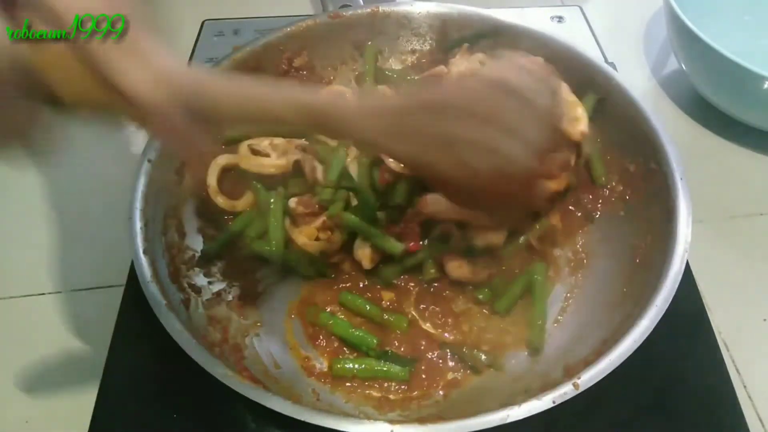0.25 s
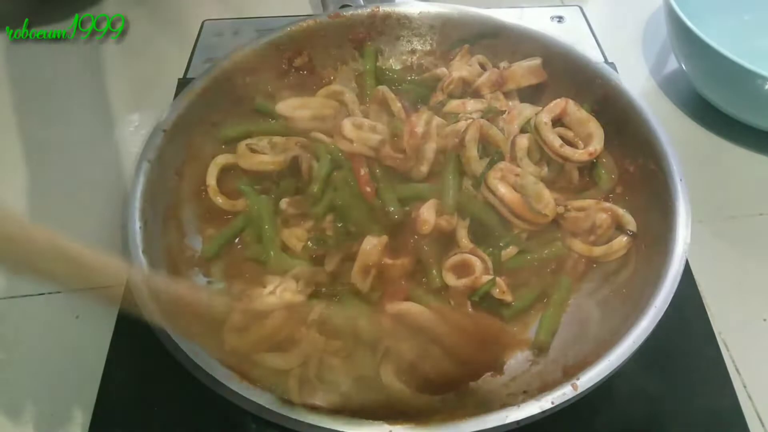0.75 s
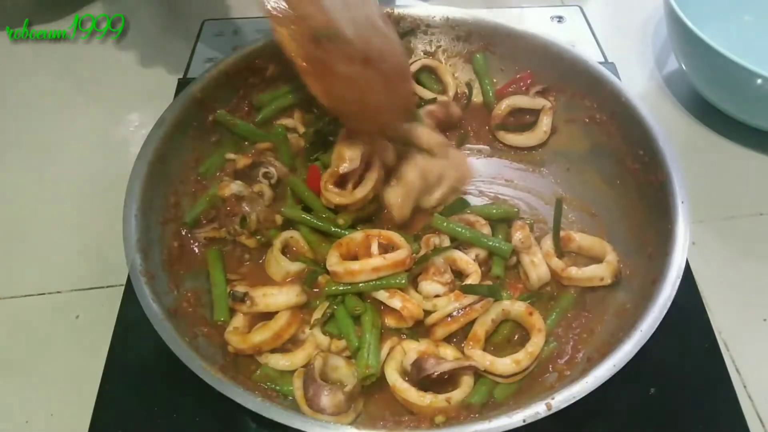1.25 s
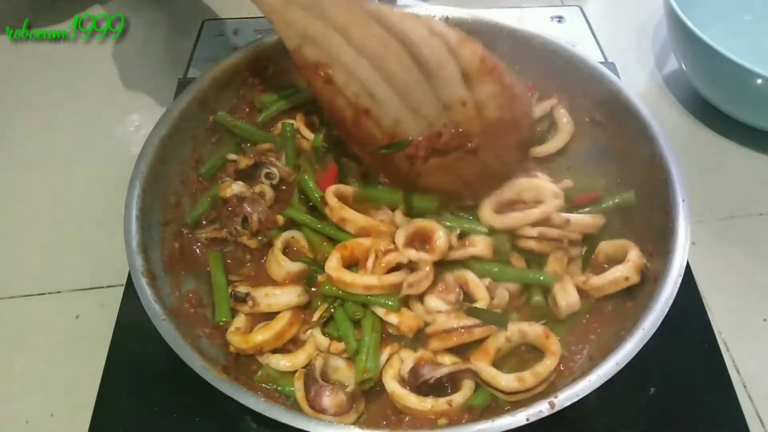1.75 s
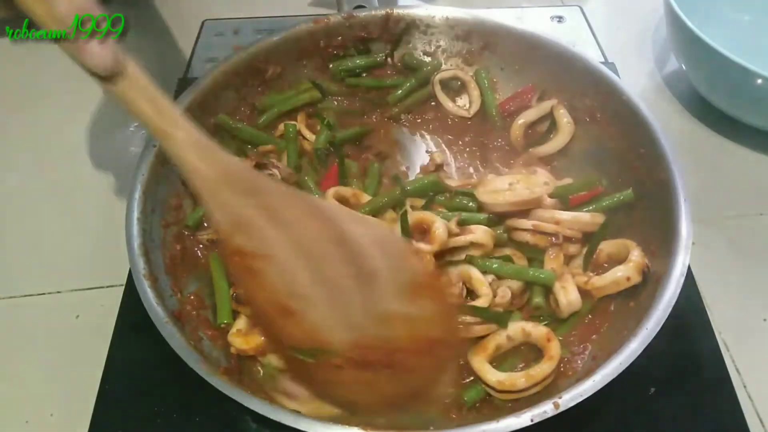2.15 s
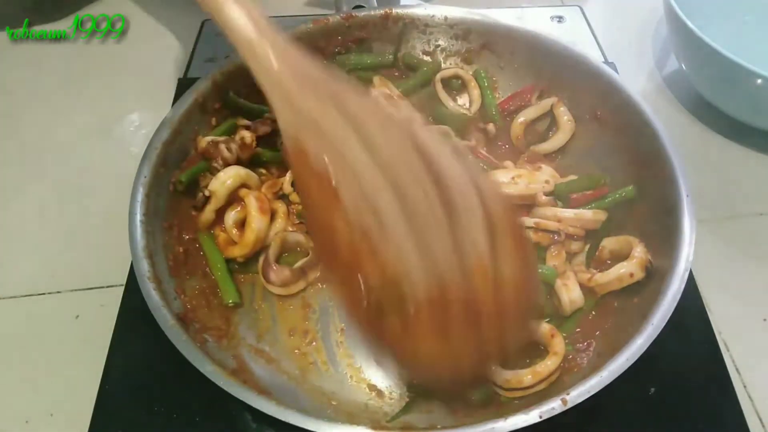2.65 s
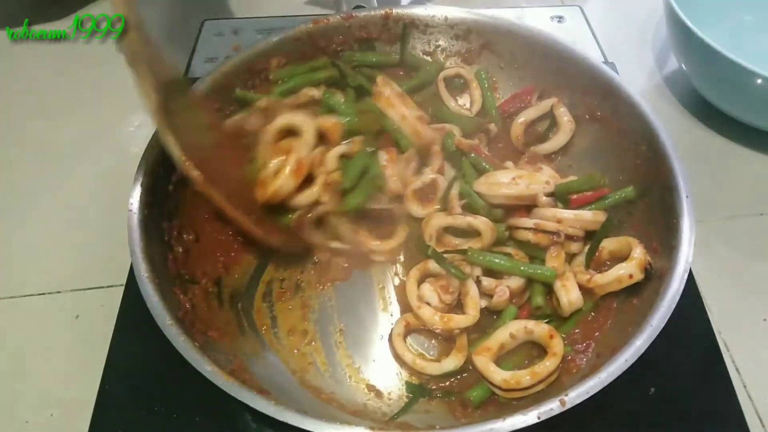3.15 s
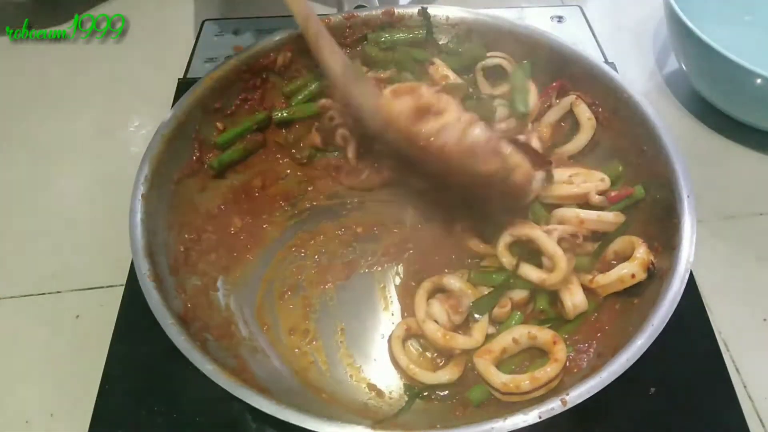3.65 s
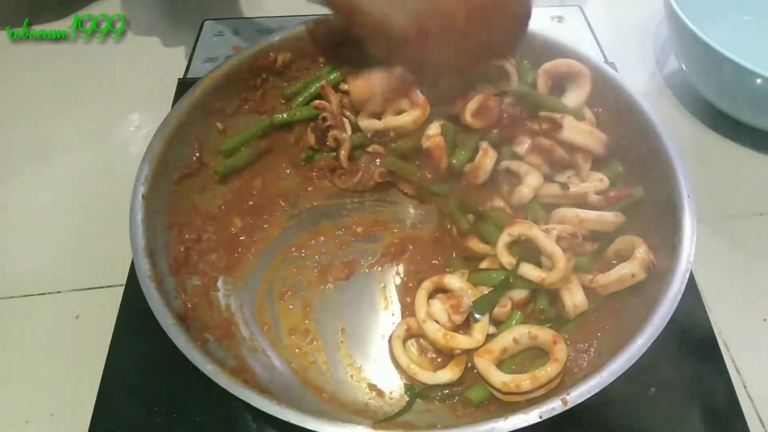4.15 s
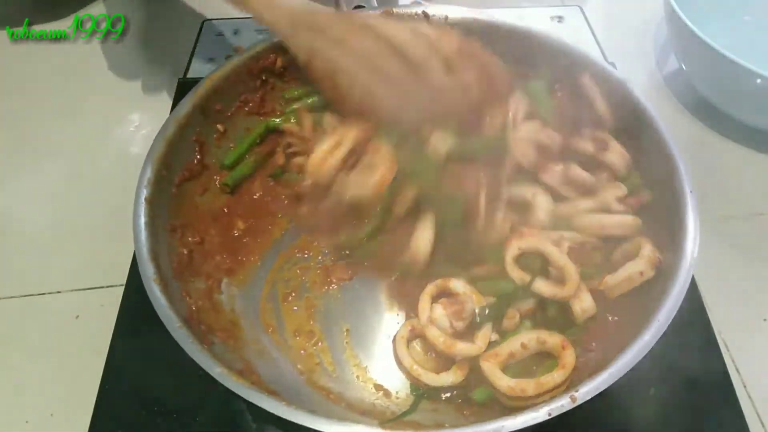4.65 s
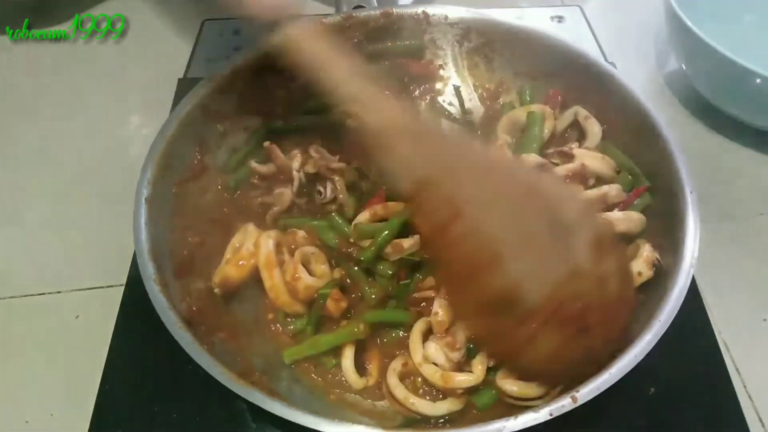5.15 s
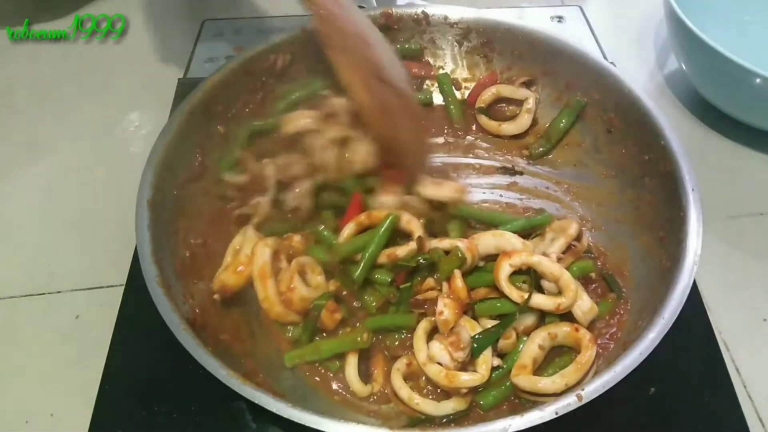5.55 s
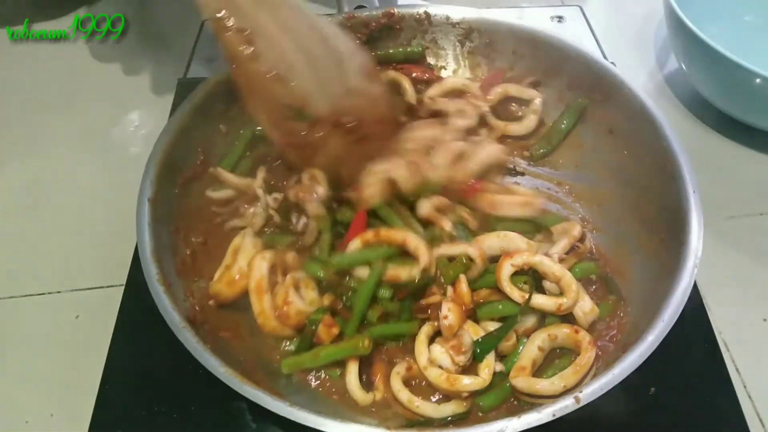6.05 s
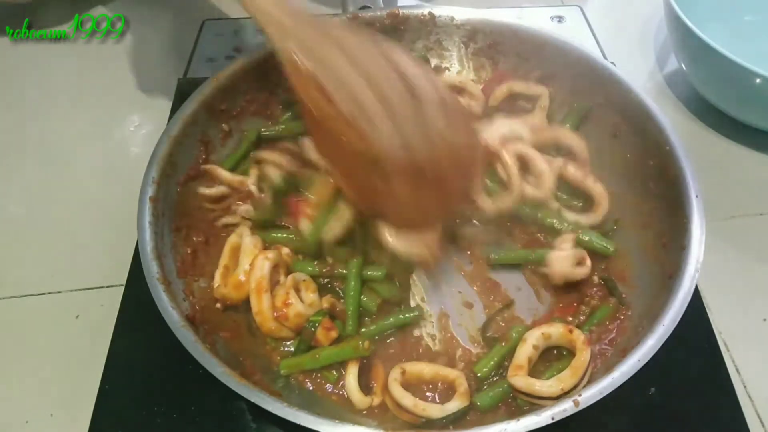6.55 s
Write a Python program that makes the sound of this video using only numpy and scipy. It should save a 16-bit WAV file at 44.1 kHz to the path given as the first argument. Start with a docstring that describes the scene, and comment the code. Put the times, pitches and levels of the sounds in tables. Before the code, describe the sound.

Close to a steel pan in a small tiled kitchen, a wooden spatula pushes squid and beans through thick sauce. Each stroke makes a bright fizz with wet smacks, sharp spits and a soft scrape, then quickly fades. Light knocks come in the first three seconds while a low engine outside pulls and runs down. Later strokes sizzle harder, and two solid pan knocks arrive near six seconds.

```python
"""A wooden spatula turns squid and beans in sauce in a steel pan on a hob, in a small tiled kitchen.
Each stroke pushes sauce onto hot steel: random clicks, shaped by filters, fizz up and die away.
Wet pieces smack and drops crack as short noise bursts; pockets plop as fading tones; wood rasps on steel,
and knocks of spatula and pan ring in many notes. The hob hums; outside an engine pulls twice and runs down."""
import sys
import numpy as np
from scipy import signal
from scipy.fft import rfft, irfft, next_fast_len
from scipy.io import wavfile
from scipy.ndimage import uniform_filter1d

SR = 44100
rng = np.random.default_rng(int(sys.argv[2]) if len(sys.argv) > 2 else 0)


def unload_audio(sound):
    """Save the sound as a 16-bit wav file, at the path given as the first command line argument."""
    columns = np.transpose(np.atleast_2d(sound))
    # keep every value between -1 and 1, then stretch to whole-number steps
    steps = np.round(np.clip(columns, -1, 1) * 32767)
    wavfile.write(sys.argv[1], SR, steps.astype(np.int16))


N = 298998
TIME = np.arange(N) / SR

# Table levels are starting points: trims, left-right balance and echo come on top.
# A left_right_db column is how much louder the left is than the right.
# spatula strokes: start_s, rise_s, push_s, fizz_db, scrape_db, spray_db, left_right_db
STROKES = [(-0.03, 0.026, 0.14, -47, -59.5, -56, -0.5), (0.06, .015, .05, -50, -63, -50, 5),
           (0.15, 0.025, 0.2, -57, -66.5, -58.5, 2), (0.38, 0.017, 0.066, -50, -59.5, -53, 1),
           (0.47, 0.05, 0.043, -47, -61.5, -58, -3), (0.96, .21, 0.088, -45, -49, -54, 1.5),
           (1.575, 0.013, .05, -51, -67, -58, 4), (1.61, 0.077, 0.12, -41, -48.5, -45.5, 6.5),
           (2.11, 0.029, 0.21, -50, -54, -66, 17.5), (2.32, 0.075, 0.15, -40, -43, -46, 5),
           (2.758, 0.034, 0.12, -56, -55, -69, 4), (2.92, 0.037, 0.074, -59, -84, -82, 1),
           (3.05, 0.054, 0.11, -46, -56, -54.5, 0.5), (3.19, 0.13, .11, -37.5, -45, -48, 0.5),
           (4.349, .015, 0.029, -55.5, -72, -79, -0.5), (4.515, .01, .05, -54, -67, -82, -4),
           (4.555, .06, 0.047, -40, -54.5, -62, -0.5), (4.632, .02, 0.13, -35.5, -48, -41, 1.5),
           (4.64, .15, 0.13, -32.5, -39.5, -44, -0.5), (5.36, .08, 0.068, -47.5, -59.5, -59, 0),
           (5.48, 0.068, 0.14, -35, -44, -45, 4), (5.925, .012, 0.049, -46.5, -59, -78, 7),
           (5.98, 0.02, 0.13, -45, -48.5, -50.5, 2.5), (6.183, .008, 0.045, -52, -65, -62, 3),
           (6.497, 0.051, 0.061, -31, -40, -43, 2)]
SWELL_DB = 20.5  # gain over the rise
SAG_DB_PER_S, LIFT_DB_PER_S = 55, 185  # fall after the rise; extra fall once the push ends
# sauce sizzling by itself between strokes: time_s, level_db
SIMMER = [(0, -64), (0.95, -64), (1.35, -56), (1.55, -56), (2.0, -67), (2.65, -68), (2.95, -65.5),
          (3.7, -75.5), (4.15, -72), (5.1, -74.5), (6.78, -76.5)]
SIMMER_PER_S = 3500  # bubbles that burst even without a stroke
PAN_SIDE_DB = 1  # left-right balance of the pan between strokes
# tone of bursting sauce: pitch_hz, level_db (per Hz)
FIZZ = [(2500, -17.5), (3600, -25), (5000, -12), (6200, -2), (7100, 0), (7700, 2.5), (8500, -7),
        (10000, -11), (12000, -23), (14500, -27)]
# tone of the finest spray from a fresh wet patch: pitch_hz, level_db (per Hz)
SPRAY = [(7500, -23.5), (9000, 2.5), (10500, -0.5), (12000, -2.5), (14300, -8.5)]
# high rings of the steel under the bubbles: pitch_hz, width_hz
STEEL_RINGS = [(7210, 170), (7720, 560), (8500, 580)]
# tone of the blade dragged through sauce: pitch_hz, level_db (per Hz)
SCRAPE = [(400, -7), (650, -14), (850, -7), (1020, -23), (1280, -12.5), (1720, -13), (2100, -8.5),
          (2950, 0), (3800, 0.5), (5000, 1), (7000, -6.5)]
# the hollow between blade and pan, shifting in pitch: time_s, pitch_hz, level_db
HOLLOW = [(0.1, 1290, 8.5), (1.15, 1281, 0.5), (1.68, 1434, -7), (1.85, 1270, 2.5), (2.2, 1450, -8.5),
          (2.38, 1433, -6), (2.55, 1346, -7.5), (3.15, 1202, -0.5), (3.35, 1327, -0.5), (4.68, 1304, 0.5),
          (4.95, 1270, -1), (5.55, 1368, 5.5), (5.75, 1270, -12), (6.52, 1492, 6), (6.65, 1251, 1.5)]
HOLLOW_DRIFT = .03  # random pitch drift, as a share of the pitch
# resonances of the hollow: ratio (times the lowest), width_hz, level_db
HOLLOW_MODES = [(1, 200, -15.5), (1.629, 220, -15), (1.88, 240, -14), (2.24, 260, -12.5), (2.6, 282.7, -22)]
# hob hum: pitch_hz, level_db
HUM = [(102.3, -70), (285.3, -78), (436.0, -79), (850.6, -84.5), (1136, -82.5)]
# tone of the kitchen air: pitch_hz, level_db (per Hz)
AIR_TONE = [(15, -55.5), (25, -26), (108, -3.5), (152, -12.5), (288, -15.5), (338, -16), (494, -13.5),
            (592, -19), (832, -20.5), (1780, -29.5), (3000, -35.5), (5200, -45), (7000, -59.5)]
AIR_DB = -65.5
# short rasps of wood on steel, low ones of the pan shifting, and one bright burst of fizz:
# start_s, level_db, length_s, centre_hz, width_hz
RUBS = [(0.003, -68, 0.58, 497, 225), (1.047, -53.5, 0.092, 4370, 2600), (1.661, -55.5, 0.14, 1410, 200.2),
        (1.727, -49.5, 0.087, 178, 50), (2.03, -61.5, 0.082, 1236, 100), (2.363, -45.5, 0.039, 3500, 2210),
        (2.456, -54.5, 0.082, 190, 60.4), (2.687, -61, 0.049, 1243, 120.5), (3.124, -58, 0.089, 1190, 262),
        (3.189, -61, 0.1, 1570, 232), (3.26, -57.5, 0.049, 1320, 160), (4.354, -64, 0.02, 2160, 600.6),
        (4.559, -55, 0.014, 4160, 900), (4.766, -43.5, 0.088, 3420, 3200),
        (4.762, -31.5, 0.033, 7604, 2970), (4.797, -50, 0.11, 1278, 167.8),
        (5.399, -57.5, 0.082, 580, 304.3), (5.439, -52, 0.022, 2500, 900),
        (6.482, -42.5, 0.04, 1868, 600.7), (6.485, -52, 0.038, 1550, 149), (6.509, -49.5, 0.13, 2200, 1000)]
# the louder wet smacks: start_s, level_db, pitch_hz, left_right_db, snap_db (snap against ring)
SMACKS = [(0.0109, -35.5, 7540, -9, -24), (0.063, -27.5, 6900, -2, 21), (0.2455, -45, 6740, 10, -6),
          (0.391, -29.5, 8020, 4, -13), (0.4962, -39, 7800, -11, -23), (0.626, -43.5, 10100, -9, 3),
          (1.012, -59, 8800, 10, -11), (1.5819, -34.5, 7434, -4, -26), (2.03, -51, 12890, 15, -32),
          (2.359, -30, 7703, 0, 15), (2.381, -24, 8335, -9, 15), (2.5054, -43, 7580, -8, 5),
          (2.7103, -42, 4740, 2, -15), (3.0656, -33.5, 6290, -3, -19), (3.0927, -26.5, 6510, -4, -3),
          (3.294, -25.5, 7600, 4, 13), (3.399, -37, 6647, -1.5, -13), (3.569, -49.5, 5470, 7, -5),
          (4.36, -41, 6414, -0.5, -24.5), (4.57, -34.5, 7460, -2, -29), (4.589, -34, 7500, -9, -18),
          (4.942, -37.5, 6514, -3, -3.5), (5.209, -54, 7700, -7, 4), (5.32, -48, 8800, 10, -3),
          (5.386, -46, 6900, -15.5, -27), (5.437, -37, 7150, -7, -13), (5.524, -24.5, 7600, 10, -4),
          (5.5414, -24, 7460, -12, 2), (5.989, -44, 7200, 3, -6), (6.0032, -33.5, 6700, -3, -6),
          (6.1887, -36.5, 7600, 4, 1), (6.503, -30.5, 8326, 2.5, 16), (6.53, -35, 7400, 2, 0),
          (6.556, -26, 7440, -1, 7)]
# sauce spitting off hot steel in single dry cracks: start_s, level_db, centre_hz, left_right_db
CRACKS = [(0.065, -27, 6800, 3), (0.393, -26.5, 7700, -3), (0.627, -33, 11100, 1), (1.24, -27, 6630, -7),
          (1.351, -37, 8000, -10), (1.806, -29, 6560, -4.5), (2.3785, -15.5, 10500, 1),
          (2.517, -26, 8100, -6), (4.606, -25, 7600, 4), (4.64, -22, 9600, 0), (4.667, -19, 7800, -2),
          (4.711, -13, 7600, -1), (5.527, -14, 8500, 1), (5.615, -18.5, 7400, 4), (6.192, -27.5, 8980, 8)]
# hollow plops of air pockets under the food: start_s, level_db, pitch_hz
PLOPS = [(0.08, -54, 1700), (0.385, -55, 1100), (0.828, -45.5, 706), (1.602, -57, 439),
         (1.691, -44.5, 1418), (2.029, -47.5, 451.8), (2.92, -49.5, 826.6), (3.147, -40, 1210),
         (5.445, -51.5, 1200)]
# soft clunks of food dropping back into the pan: start_s, level_db, pitch_hz
CLUNKS = [(.245, -57.5, 220.6), (.285, -60, 298.6), (4.212, -68, 132.2), (4.535, -47.5, 380),
          (4.625, -50, 438), (5.005, -56.5, 500), (5.43, -54, 635.3), (5.585, -52, 841)]
# knocks of the spatula on the pan, and of the pan on the hob:
# start_s, six level_db (one per register, low to high), ring_db, chatter_s, rim_db
KNOCKS = [(0.522, -73, -74, -58.5, -55, -48, -72, -24, 0.049, -70),
          (2.1318, -42, -37.5, -82, -39.5, -32.5, -29.5, -11, 0.015, -58),
          (2.379, -68, -69, -61, -64, -54.5, -49, -35, 0.042, -66),
          (2.7795, -67, -52, -54, -49, -47.5, -72, -22, 0.013, -66),
          (2.786, -42.5, -51.5, -50, -51.5, -47, -65, -12, 0.023, -55.5),
          (2.811, -72, -64, -64, -63, -57.5, -75, -26, .015, -77),
          (4.498, -68, -44.5, -40, -69, -78, -67, -19, 0.04, -83),
          (5.9359, -33.5, -36, -39.5, -36.5, -45, -50, -10, 0.014, -74),
          (6.0311, -37, -32.5, -31.5, -31, -55, -61.5, -50.5, 0.013, -69)]
# borders of the six registers of a knock: edge_hz
KNOCK_EDGES_HZ = [350, 560, 1000, 1450, 2100, 4200, 13000]
# notes of the pan, damped by its load: pitch_hz, t60_s (time to fall 60 dB), level_db
PAN_MODES = [(375, .07, -10), (438, .11, 0), (505, .06, -13), (655, .06, -5), (715, .08, 0), (765, .1, -6),
             (1070, .05, -7), (1245, .05, 0), (1580, .035, -4), (1790, .035, 0), (2100, .025, 1),
             (2450, .015, -3), (2780, .016, 1), (2950, .018, 4), (3630, .012, -1), (4130, .009, -5),
             (4940, .01, -4), (5900, .006, -3), (7200, .006, -2), (7750, .006, 0), (9500, .005, 0)]
RIM_HZ, RIM_SPLIT_HZ, RIM_T60_S = 2960, 19, .6  # rim note, distance to its twin, time to fall 60 dB
# engine outside, pulling twice and running down: time_s, firing_hz, level_db
ENGINE = [(0.6, 97.95, -85), (0.78, 94.9, -52.5), (0.86, 93, -53), (0.91, 93.47, -50.5),
          (1.18, 93.6, -45.5), (1.27, 95.8, -50), (1.42, 99.6, -58.5), (1.7, 93, -78), (1.76, 90.8, -59),
          (1.83, 87.2, -46), (1.866, 82.2, -40.5), (1.92, 83, -40), (1.953, 82.5, -46), (1.98, 79.5, -38.5),
          (2.025, 77.96, -36), (2.09, 75.4, -43), (2.155, 74, -42), (2.21, 64.5, -52), (2.348, 63.6, -49.5),
          (2.492, 62.76, -49), (2.56, 57, -54), (2.65, 50.45, -55), (2.79, 48.74, -49), (2.93, 50.2, -65.5)]
# kitchen echo: centre_hz, t60_s (time to fall 60 dB)
ROOM = [(250, 0.53), (700, 0.33), (1800, 0.34), (4500, 0.25), (9000, 0.17), (14000, 0.32)]
TOP_HZ = 14400  # upper limit of the whole sound


def undb(db):
    """Decibels to gain."""
    return 10 ** (np.asarray(db) / 20)


def unit(x):
    """Scale to an average strength (rms) of 1."""
    return x / np.sqrt(np.mean(x ** 2) + 1e-24)


def curves(table):
    """The columns of a table, joined by straight lines in time."""
    s, *columns = np.transpose(table)
    return [np.interp(TIME, s, c) for c in columns]


def sides(left_right_db):
    """Left and right gains, half of the difference each."""
    return undb(np.array([[.5], [-.5]]) * left_right_db)


def fade(t, t60):
    """Smooth dying away, by 60 dB in t60 seconds."""
    return undb(-60 * t / max(t60, 1e-4))


def band(x, lo, hi, order=2):
    """Keep only the pitches from lo to hi."""
    sos = signal.butter(order, [lo, min(hi, SR / 2.1)], "band", fs=SR, output="sos")
    return signal.sosfilt(sos, x)


def register(x, lo, hi):
    """One register of a sound, kept in phase with its neighbours so that they add to a sharp blow."""
    backwards = band(x, lo, hi)[..., ::-1]
    return band(backwards, lo, hi)[..., ::-1]


def colour(x, points):
    """Give a sound the tone drawn by (Hz, dB) points, falling off beyond its ends."""
    hz, db = np.transpose(points)
    size = next_fast_len(N)
    f = np.maximum(np.fft.rfftfreq(size, 1 / SR), 1)
    skirts = np.minimum(f / hz[0], 1) ** 2 * np.minimum(hz[-1] / f, 1) ** 2
    gain = skirts * undb(np.interp(np.log(f), np.log(hz), db))
    return irfft(rfft(x, size) * gain, size)[..., :N]


def walk(rate):
    """Slow random wandering, about `rate` new values a second, with a spread near 1."""
    k = int(SR / rate)
    steps = np.repeat(rng.standard_normal(N // k + 1), k)
    return unit(uniform_filter1d(steps, k)[:N])


def wander(x, spread_db, size=1024, order=3):
    """Random gains that drift over time and pitch, so narrow bands come and go."""
    _, _, z = signal.stft(x, nperseg=size)
    field = rng.standard_normal(z.shape[1:])
    for axis in (0, 1):
        field = uniform_filter1d(field, order, axis=axis)
    return unit(signal.istft(z * undb(spread_db * unit(field)), nperseg=size)[1][:, :N])


def resonate(x, hz, width_hz):
    """A steep resonance whose centre may move; rms 1."""
    turn = np.exp(2j * np.pi * np.cumsum(hz * np.ones(N)) / SR)
    pole = np.exp(-np.pi * abs(width_hz) / SR)
    # shift the resonance down to 0 Hz, smooth there, shift back
    smoothed = signal.lfilter([1], np.poly([pole, pole]), x * turn.conj())
    return unit((turn * smoothed).real)


def grains(rate, spread_db, size=9):
    """Random clicks from all over the pan, each reaching the two ears up to `size` samples apart."""
    at = np.flatnonzero(rng.random(N) < rate / SR)
    strength = undb(spread_db * np.minimum(rng.exponential(size=len(at)), 5))
    strength = strength * rng.choice([-1, 1], len(at))
    strength = strength / np.sqrt(rate[at])  # crowded clicks are weaker, so loudness stays even
    lagged = np.clip(at + rng.integers(-size, size + 1, len(at)), 0, N - 1)
    return unit(np.array([np.bincount(i, strength, N) for i in (at, lagged)]))


def add(out, s, sound):
    """Mix a sound in at time s."""
    i = max(int(s * SR), 0)
    out[:, i:i + sound.shape[-1]] += sound[..., :max(N - i, 0)]


def stirring(simmer_scrape_db=-7, simmer_spray_db=-13):
    """Fizz, scrape and spray levels and side: a stroke swells, sags as the blade pushes, dies as it lifts."""
    s = np.arange(0, N / SR, .002)
    start, rise, push, fizz_db, scrape_db, spray_db, left_right_db = np.transpose(STROKES)[..., None]
    t = s - start - rise  # time since the top of the swell
    shape_db = -SWELL_DB * np.minimum(t / rise, 0) ** 2
    shape_db = shape_db - SAG_DB_PER_S * np.maximum(t, 0) - LIFT_DB_PER_S * np.maximum(t - push, 0)
    simmer_db = np.interp(s, *np.transpose(SIMMER))
    # overlapping strokes add as powers
    strokes = undb(fizz_db + shape_db) ** 2
    fizz = strokes.sum(0) + undb(simmer_db) ** 2
    scrape = (undb(scrape_db + shape_db) ** 2).sum(0) + undb(simmer_db + simmer_scrape_db) ** 2
    spray = (undb(spray_db + shape_db) ** 2).sum(0) + undb(simmer_db + simmer_spray_db) ** 2
    side_db = PAN_SIDE_DB + (strokes * (left_right_db - PAN_SIDE_DB)).sum(0) / fizz
    return curves(np.transpose([s, *10 * np.log10([fizz, scrape, spray]), side_db]))


def frying(fizz_gain_db=-2.0, scrape_gain_db=-1.5, spray_gain_db=-3, bubbles_per_s=5000,
           flicker_db=1.4, steel_db=-11, steel_drift=0.014, judder_db=2.5):
    """More sauce on hot steel bursts more bubbles that ring it; the blade's uneven slips sound the hollow."""
    fizz_db, scrape_db, spray_db, side_db = stirring()
    rate = SIMMER_PER_S + bubbles_per_s * undb(fizz_db + 42)  # bubbles_per_s are added at -42 dB of fizz
    flicker = undb(flicker_db * walk(60))
    pops, slides = grains(rate, 3.4), grains(rate / 2, 2.8)

    bursts = wander(colour(pops, FIZZ), 6.5)
    steel = sum(resonate(pops, hz * (1 + steel_drift * walk(9)), width) for hz, width in STEEL_RINGS)
    fizz = (bursts + steel * undb(steel_db)) * undb(fizz_db + fizz_gain_db)
    spray = wander(colour(pops, SPRAY), 5) * undb(spray_db + spray_gain_db)

    drag = wander(colour(slides, SCRAPE), 5.5) * undb(scrape_gain_db)
    hollow_hz, hollow_db = curves(HOLLOW)
    hollow = 0
    for ratio, width, db in HOLLOW_MODES:
        mode_hz = ratio * hollow_hz * (1 + HOLLOW_DRIFT * walk(14))
        hollow = hollow + resonate(slides, mode_hz, width) * undb(db)
    judder = unit(undb(judder_db * walk(110)))  # the blade catches and lets go
    scrape = (drag + hollow * undb(hollow_db)) * judder * undb(scrape_db)
    return (fizz + spray + scrape) * flicker * sides(side_db)


def squelches(count, stir_db, above_db, spread_db, cycles, centre_hz, scatter):
    """Bubbles burst between the moving pieces and ring for a moment, most of them near one pitch."""
    out, t = np.zeros((2, N)), np.arange(SR // 25) / SR
    for when, pitch, loud, side in rng.random((count, 4)):
        hz = centre_hz * np.clip((pitch / (1 - pitch)) ** scatter, .5, 1.6)
        ring = np.sin(2 * np.pi * hz * t) * fade(t, cycles / hz) * (1 - fade(t, .004))
        db = stir_db[int(when * N)] + above_db + spread_db * min(-np.log(1 - loud), 3)
        add(out, when * N / SR, ring * undb(db) * sides(12 * (side - .5)))
    return out


def bubbling():
    """Small bubbles ping in hot sauce, now and then one spits; larger ones squish from under the blade."""
    fizz_db, scrape_db, *_ = stirring()
    small = squelches(count=260, stir_db=np.minimum(fizz_db, -47), above_db=4.5, spread_db=0.0,
                      cycles=220, centre_hz=7126, scatter=0.057)
    spits = squelches(count=60, stir_db=np.minimum(fizz_db, -52), above_db=16.5, spread_db=0.5,
                      cycles=64, centre_hz=7400, scatter=0.086)
    large = squelches(count=800, stir_db=scrape_db, above_db=-3.0, spread_db=2.5,
                      cycles=28, centre_hz=2490, scatter=0.21)
    return small + spits + large


def background(hum_db=0, side_db=-9):
    """The hob hums in a few plain tones over a soft rush of air, made of filtered noise."""
    hum = 0
    for hz, db in HUM:
        hum = hum + undb(db) * np.sqrt(2) * np.sin(2 * np.pi * hz * TIME + .5 * walk(5.1))
    mid, side = unit(colour(rng.standard_normal((2, N)), AIR_TONE))
    air = mid + undb(side_db) * side * np.array([[1], [-1]])
    return (undb(hum_db) * hum + undb(AIR_DB) * air) * sides(1.2)


def rubs(slips_per_s=2200):
    """Short bursts of random clicks: wood sticks and slips on steel, the pan shifts, fizz flares once."""
    out, slips = np.zeros((2, N)), grains(np.full(N, slips_per_s), 1.5)
    for s, db, length, hz, width in RUBS:
        i, n = int(s * SR), int(length * SR)
        rasp = unit(band(slips[:, i:i + n], max(hz - width / 2, 20), hz + width / 2))
        add(out, s, rasp * signal.windows.tukey(n, .5) * undb(db))
    return out


def smacks(snap_t60=0.016, ring_t60=0.042, swell_s=0.001, gain_db=4):
    """A larger film tears with a broad snap, and the pocket behind it rings briefly."""
    out, t = np.zeros((2, N)), np.arange(SR // 20) / SR
    for s, db, hz, left_right_db, snap_db in SMACKS:
        shared, *own = rng.standard_normal((3, len(t))) * (1 - np.exp(-t / swell_s))
        noise = shared + 1.7 * np.array(own)  # partly the same at both ears
        snap = band(noise * fade(t, snap_t60), 6100, 9200)
        ring = band(noise * fade(t, ring_t60), hz / 1.05, hz * 1.05)
        smack = undb(snap_db) * unit(snap) + unit(ring)
        smack = smack / np.abs(smack).max() * undb(db + gain_db)
        add(out, s, smack * sides(np.clip(left_right_db, -10, 10)))
    return out


def cracks(t60=.005, gain_db=-3, size=440):
    """A drop flashes to steam: one very short bright burst."""
    out, t = np.zeros((2, N)), np.arange(size) / SR
    for s, db, hz, left_right_db in CRACKS:
        shared, *own = rng.standard_normal((3, size)) * fade(t, t60)
        crack = band(shared + .5 * np.array(own), hz / 1.25, hz * 1.25, order=3)
        add(out, s, crack / np.abs(crack).max() * undb(db + gain_db) * sides(left_right_db))
    return out


def plops(table, cycles, rise_s, glide):
    """Hollow rings that swell in softly; with glide above 0 they rise a little in pitch."""
    out, t = np.zeros((2, N)), np.arange(SR // 8) / SR
    for s, db, hz in table:
        tone = np.sin(2 * np.pi * hz * t * (1 + glide * t))
        plop = tone * fade(t, cycles / hz) * (1 - np.exp(-t / rise_s))
        add(out, s, plop / np.abs(plop).max() * undb(db))
    return out


def knocks(gain_db=-1, chatter_db=-21.0, squash_db=-6, build_cycles=2.2, size=900):
    """Noise swells into a hit that chatters and rings the pan; the spot struck weights modes and registers."""
    out, t = np.zeros((2, N)), np.arange(SR // 2) / SR
    lead = SR // 150  # samples of squash before the hit
    hold = SR // 400  # samples that each bounce strength lasts
    for s, *levels, ring_db, chatter_s, rim_db in KNOCKS:
        bounces = np.repeat(rng.standard_normal(len(t) // hold + 1), hold)[:len(t)]
        bounces = unit(undb(5 * bounces))
        mid, side = rng.standard_normal((2, len(t))) * bounces * fade(t, chatter_s) * undb(chatter_db)
        contact = mid + band(side, 1500, 14940) * np.array([[1], [-1]])  # lows reach both ears alike
        contact[:, 0] += 1  # the hit itself
        squash = rng.standard_normal(lead) * np.linspace(0, 1, lead) ** 2 * undb(chatter_db + squash_db)
        contact = np.hstack([[squash, squash], contact])

        weights = undb(ring_db + 2 * rng.standard_normal(len(PAN_MODES)))
        # the shifting food detunes the modes; the low ones take longest to build up
        load = 1 + 0.006 * rng.standard_normal(len(PAN_MODES))
        body = 0
        for weight, detune, (hz, t60, db) in zip(weights, load, PAN_MODES):
            tone = np.sin(2 * np.pi * hz * detune * t) * fade(t, t60)
            body = body + weight * undb(db) * tone * (1 - np.exp(-t * hz / build_cycles))
        body[0] += 1  # lets the contact itself through
        blow = signal.fftconvolve(contact, body[None], axes=1)[:, :len(t)]
        for lo, hi, db in zip(KNOCK_EDGES_HZ, KNOCK_EDGES_HZ[1:], levels):
            part = register(blow, lo, hi)
            strength = part[:, lead:lead + size].std()
            add(out, s - lead / SR, part / strength * undb(db + gain_db))

        rim = np.sin(2 * np.pi * RIM_HZ * t)
        rim = rim + .5 * np.sin(2 * np.pi * (RIM_HZ + RIM_SPLIT_HZ) * t)  # a close pair that beats
        add(out, s, rim * fade(t, RIM_T60_S) * undb(rim_db))
    return out * sides(3)


def engine(tone_db=-2, second_db=-18, rumble_db=-14, boom_db=-3.5, lope_db=2.5, wobble=0.011,
           pulling_hz=92, coasting_hz=82, wall_hz=187, wall_db=6.5, low_cut_hz=60):
    """Through the wall come the two lowest firing harmonics, a dull rumble and a boom; the level lopes."""
    hz, level_db = curves(ENGINE)
    phase = 2 * np.pi * np.cumsum(hz * (1 + wobble * walk(30.5))) / SR
    favoured_db = wall_db * np.exp(-((2 * hz - wall_hz) / 14) ** 2)  # the wall passes one note more easily
    deepest = 1 / np.hypot(1, (low_cut_hz / hz) ** 4)  # the first harmonic fades out below low_cut_hz
    first = undb(tone_db + lope_db * walk(25.1)) * deepest * np.sin(phase)
    second = undb(second_db + favoured_db + 3.9 * walk(6.6)) * np.sin(2 * phase)
    rumble = unit(band(rng.standard_normal(N), 91, 190, order=3)) * undb(rumble_db)
    # off the throttle, the low note of the kitchen booms
    off_throttle = np.clip((pulling_hz - hz) / max(pulling_hz - coasting_hz, 1), 0, 1)
    coasting = off_throttle * coasting_hz / hz
    boom = np.sin(2 * np.pi * 100 * TIME + 0.48 * walk(2.3)) * coasting * undb(boom_db)
    present = np.interp(TIME, [.4, .65, 2.9, 3.05], [0, 1, 1, 0])
    return (np.sqrt(2) * (first + second) + rumble + boom) * undb(level_db) * present * sides(3.5)


def kitchen(x, wet_db=-5, gap_s=0.00072, build_s=0.00095):
    """Counter and tiled walls return a short dense echo, alike at both ears only in the lows."""
    t = np.arange(int(.6 * SR)) / SR
    hz, echo = np.transpose(ROOM)[0], 0
    edges = [hz[0] / 2, *np.sqrt(hz[1:] * hz[:-1]), SR / 2]
    for lo, hi, (centre, t60) in zip(edges, edges[1:], ROOM):
        mid, side = band(rng.standard_normal((2, len(t))), lo, hi, order=3)
        width = min(centre / 1300, 1)
        both_ears = (mid + width * side * np.array([[1], [-1]])) / np.hypot(1, width)
        echo = echo + both_ears * fade(t, t60)
    echo = unit(echo * np.clip((t - gap_s) / build_s, 0, 1)) / np.sqrt(len(t))
    return x + undb(wet_db) * signal.fftconvolve(x, echo, axes=1)[:, :N]


def stirred_kitchen(x, wet_db, turns_per_s=1.5):
    """Arm and blade move over the pan, so its sound keeps finding other paths into the room."""
    turn = 2 * np.pi * turns_per_s * TIME + walk(3)
    out = x
    for share in (np.cos(turn), np.sin(turn)):
        out = out + kitchen(x * share, wet_db=wet_db) - x * share  # the echo alone
    return out


def scene():
    """Pan sounds echo in the kitchen; engine, hum and air are added without echo."""
    air_pockets = plops(PLOPS, cycles=49, rise_s=0.011, glide=0.62)
    dropped_food = plops(CLUNKS, cycles=49.0, rise_s=0.008, glide=0)
    stirred = frying() + bubbling() + rubs() + smacks() + cracks()
    food = stirred_kitchen(stirred, wet_db=-5) + kitchen(air_pockets + dropped_food, wet_db=-5.5)
    return food + kitchen(knocks(), wet_db=-6.5, build_s=0.0066) + engine() + background()


def record(dry):
    """A steep filter cuts the top above TOP_HZ."""
    return signal.sosfilt(signal.ellip(10, .2, 80, TOP_HZ, fs=SR, output="sos"), dry)


dry = scene()
out = record(dry)
unload_audio(out)
```